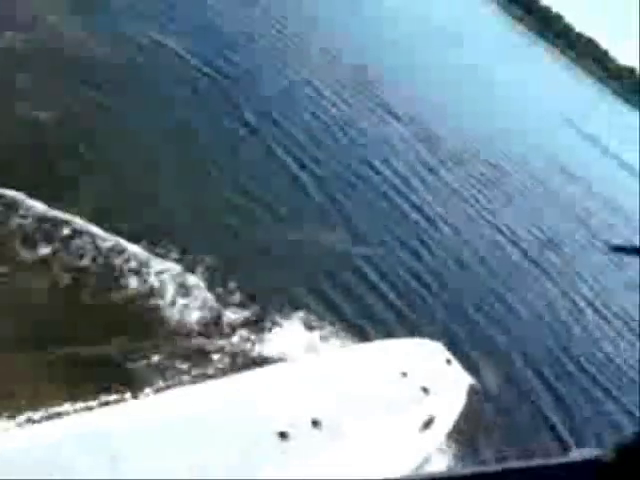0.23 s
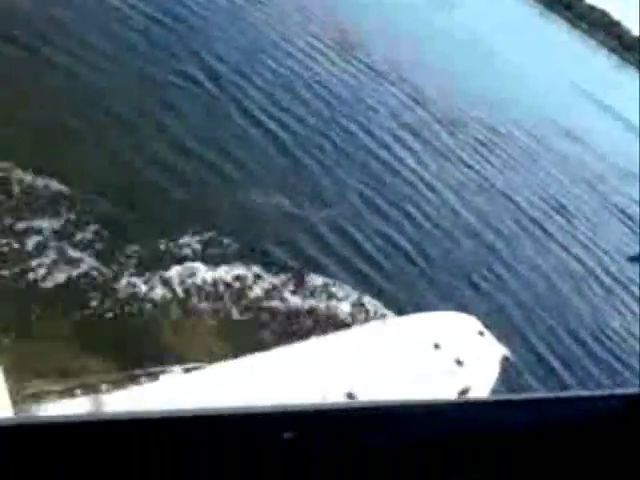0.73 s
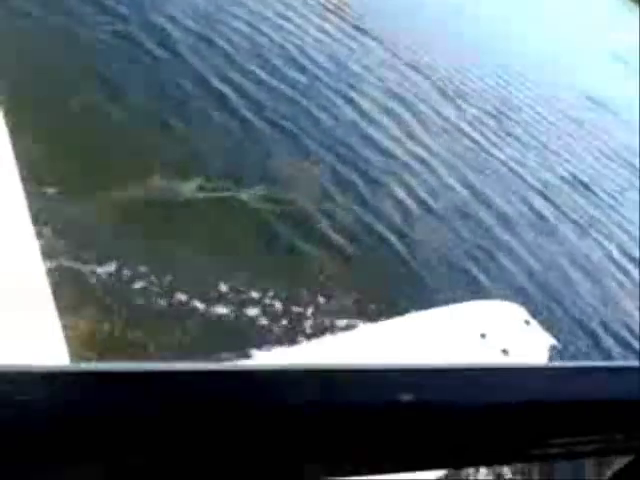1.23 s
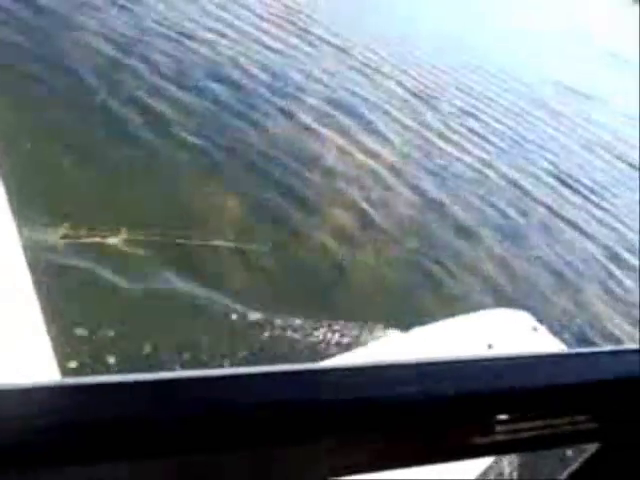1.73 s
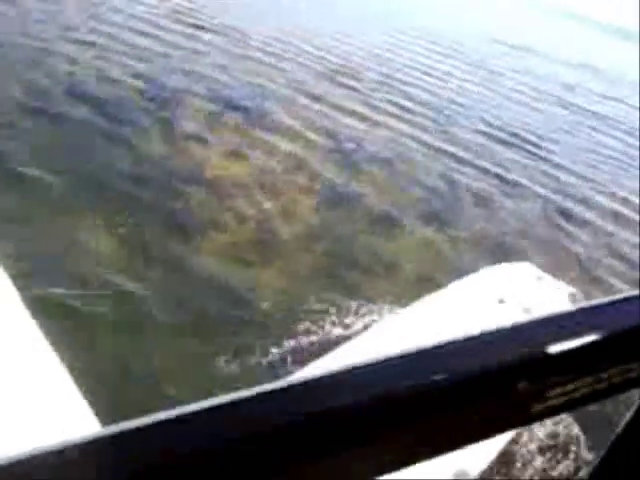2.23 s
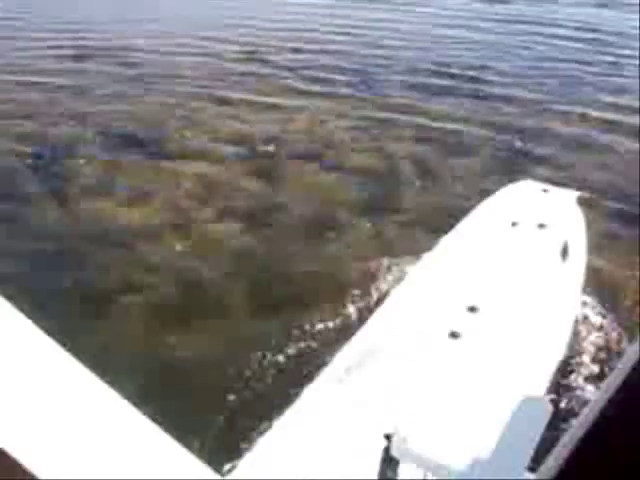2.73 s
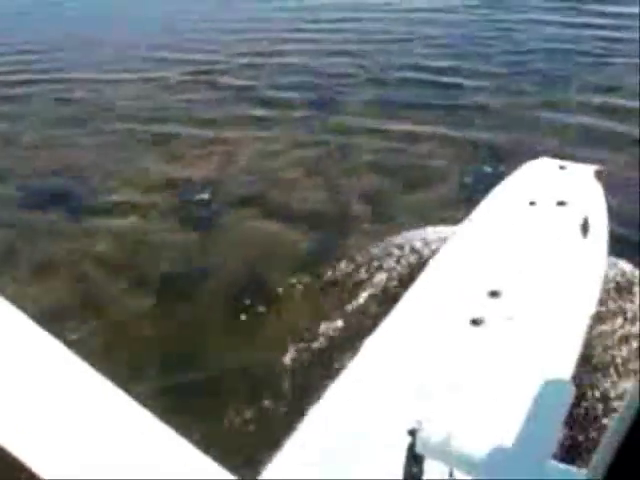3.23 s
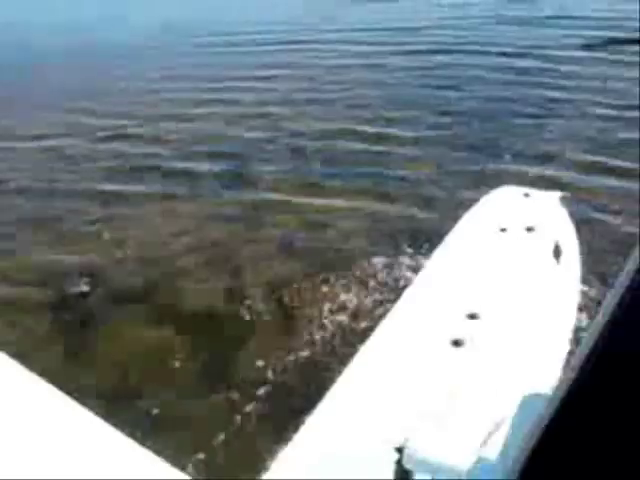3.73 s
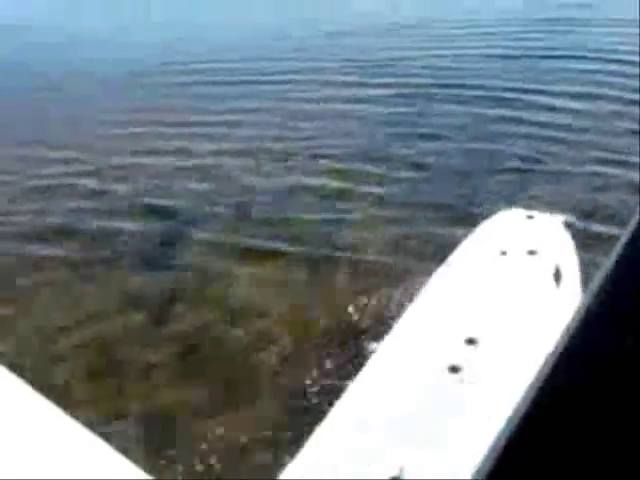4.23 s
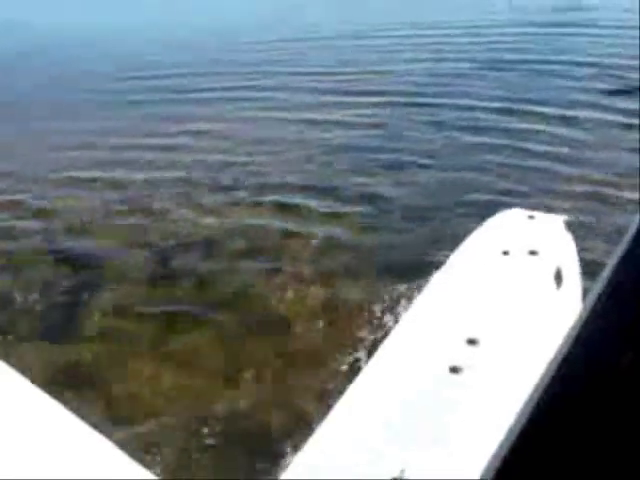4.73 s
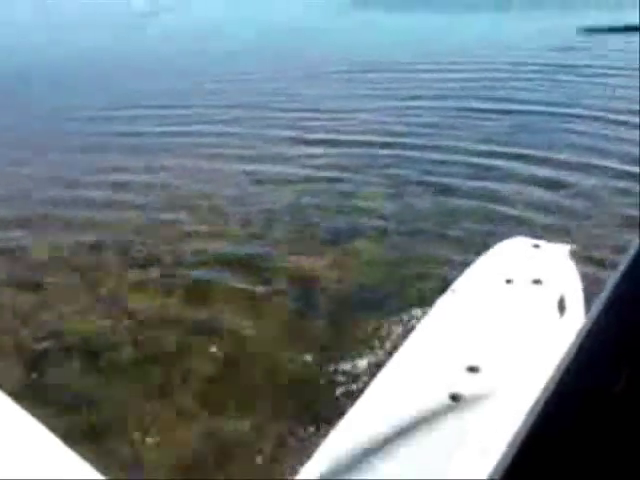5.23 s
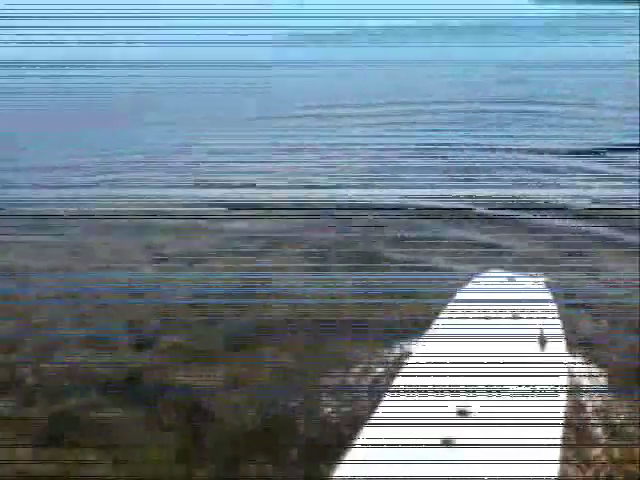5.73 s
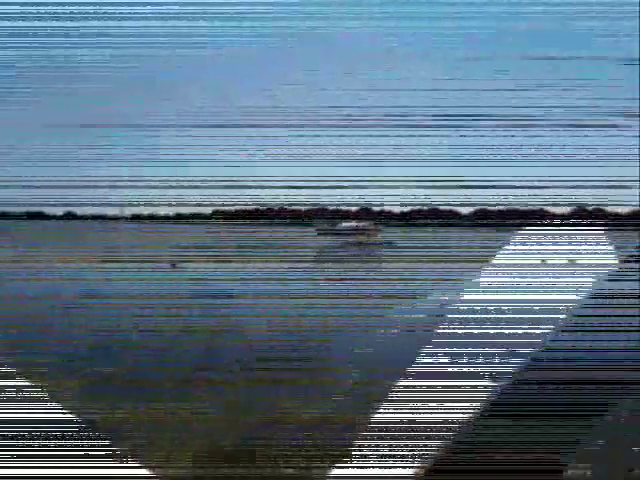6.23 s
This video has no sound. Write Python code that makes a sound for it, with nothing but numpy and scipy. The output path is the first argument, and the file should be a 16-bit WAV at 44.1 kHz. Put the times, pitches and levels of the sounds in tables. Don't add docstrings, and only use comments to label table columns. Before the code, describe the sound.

At the open door of a floatplane on a lake, rough wind thumps overload a small microphone above a low idling engine. The idle sinks, a thin panel hum shows briefly, then the engine revs up quickly to a hard propeller drone. Gusts return, break into isolated cracks and thin out. Water bubbles faintly beside the float, and a last flurry comes as everything fades.

```python
import sys
import numpy as np
from scipy import signal
from scipy.fft import rfft, irfft, next_fast_len
from scipy.io import wavfile
from scipy.ndimage import uniform_filter1d, map_coordinates

SR = 44100
rng = np.random.default_rng(int(sys.argv[2]) if len(sys.argv) > 2 else 0)


def elevation(decibels):
    levels = np.asarray(decibels, float)
    return 10 ** (levels / 20)


def transcribe(u):
    v = np.clip(np.atleast_2d(u).T, -1, 1)
    q = np.round(v * 32767).astype(np.int16)
    wavfile.write(sys.argv[1], SR, q)


N = 285710

# (time [s], firing rate [Hz], power [dB], once-a-turn bark depth [0-1])
ENGINE = [(0, 61.13, -30, 0.8), (1.2, 54.3, -39.5, 0), (1.6, 53.27, -38, 0.4), (2.2, 54.84, -35, 0.3),
          (2.33, 57.7, -31.5, 0.7), (2.44, 61.87, -28, 0.6), (2.55, 70.3, -22.5, 0.8),
          (2.8, 84.42, -22.5, 0.2), (3.1, 94.7, -26.5, 0.5), (3.6, 96.5, -29, .1), (4.2, 95.33, -25, 0.2),
          (5, 94.8, -24.5, .1), (5.7, 94.69, -22, 0.4), (6.1, 94.84, -21.5, .4), (6.22, 95.08, -19, .75),
          (6.35, 95.16, -18.5, .85), (6.48, 96, -21, 0.6)]
# (multiple of shaft speed [1], level [dB])
SHAFT_ORDERS = [(1, -16), (2, -1.5), (3, -19.5), (4, -10.5), (5, -13.5), (6, -19), (7, -17.5), (8, -17)]
# (frequency [Hz], density [dB per Hz])
RASP_SPECTRUM = [(180, -34.5), (300, -9), (327, 0), (376, -2), (401, -10.5), (427, -13.5), (451, -10.5),
                 (868, -3), (998, -8.5), (1100, -8), (1600, -14.5), (2980, -22), (3900, -35), (5070, -79.5),
                 (8580, -120)]
# (frequency [Hz], density [dB per Hz])
BARK_SPECTRUM = [(250, -28), (550, -4), (1050, -17), (1450, 0), (1750, -2), (2100, -9), (2600, -22),
                 (4000, -32)]
# (frequency [Hz], width [Hz], gain [dB])
COWL_RESONANCES = [(850, 250, 0), (1620, 230, 4), (2080, 240, 6)]
# (frequency [Hz], density [dB per Hz])
WASH_SPECTRUM = [(18, -58), (30, -17), (86, 8), (144, -3), (301, -3), (326, -8.5), (402, -11.5), (700, -13),
                 (910, -50.5), (1540, -120)]
# (time [s], length [s], strength
# [dB], sharpness [0-1])
GUSTS = [(0, 0.033, -3.5, 0.84), (0.043, 0.095, -4, 0.61), (0.156, 0.093, -5.5, 0.74),
         (0.258, 0.041, -8, .35), (0.287, 0.11, -6, 0.76), (0.418, 0.022, -3.5, .3),
         (0.476, 0.061, -4.5, 0.82), (0.58, .014, -4.5, 0.4), (0.601, 0.0058, -10.5, 0.1),
         (0.649, .05, -3, 0.69), (.747, 0.075, -6, 0.79), (0.825, 0.072, -4, 0.62),
         (0.916, .025, -9, 0.3), (0.952, 0.014, -7, 0.7), (1.008, 0.023, -4.5, 0.57),
         (1.033, .046, -3.5, 0.51), (1.105, 0.047, -3, 0.3), (1.177, 0.0066, -7, 1),
         (1.208, 0.047, -5, 0.83), (1.27, 0.038, -3, 0.62), (1.345, 0.018, -11, 0.6),
         (1.363, 0.037, -1, 0.66), (1.468, 0.014, -5.5, 0.7), (1.505, 0.036, -3.5, .6),
         (1.576, 0.024, -8.5, 0.3), (1.644, 0.0059, -4, .3), (1.733, 0.0029, -8.5, 0.2),
         (1.824, .018, -8, .4), (1.95, 0.014, -10.5, 0.3), (2.092, 0.023, -7.5, 0.01),
         (2.46, .0061, -8.5, 0.087), (2.519, 0.016, -10.5, 0.23), (2.622, 0.016, -12, 0.64),
            (2.678, 0.059, -9, 0.66), (2.744, 0.03, -3, 0.4), (2.781, .045, -6.5, .6),
            (2.825, 0.054, -8, 0.57), (2.919, 0.041, -5.5, .45), (2.978, 0.033, -8.5, .25),
            (3.03, 0.025, -4, 0.76), (3.082, 0.027, -0.4, 0.26), (3.111, .047, -6.5, 0.48),
            (3.199, 0.059, -3.9, 0.57), (3.293, 0.059, -8.5, 0.24), (3.425, .029, -2.5, 0.33),
            (3.487, .041, -18.5, 0.86), (3.54, .04, -8.5, 0.27), (3.594, .0098, -17.5, 0.061),
            (3.62, 0.0082, -5.5, 0.24), (3.649, .046, -9.5, 0.58), (3.703, .036, -4.5, 0.46),
            (3.758, .024, -11, .52), (3.821, 0.0046, -3, 0.54), (3.923, .015, -3, 0.28),
            (3.958, 0.011, -13.5, 0.22), (4.003, .026, -3.5, .6), (4.06, 0.015, -20, .15),
            (4.088, 0.013, -6, .02), (4.143, 0.0051, -14.5, .4), (4.194, 0.023, -12, .2),
         (4.35, 0.029, -10, 0.085), (4.454, 0.016, -10.5, 0.22), (4.75, 0.014, -17.5, .1),
            (5.06, 0.01, -17, 0.12), (5.882, 0.012, -3, 0.33), (5.922, 0.036, -7.5, .3),
            (5.976, 0.065, -9, .4), (6.021, 0.025, -12, 0.26), (6.066, 0.022, -17, 0.55),
            (6.115, .034, -12.5, 0.71), (6.17, 0.021, -12, 0.33)]
# (frequency [Hz], density [dB per Hz])
THUMP_SPECTRUM = [(30, -31), (70, -1.5), (130, 7), (220, 2), (380, -1.5), (700, -21.5), (1500, -39.5)]
# (frequency [Hz], density [dB per Hz])
SLAP_SPECTRUM = [(120, -25.5), (250, -4), (450, 1), (750, -4), (1200, -20), (2500, -46.5)]
# (frequency [Hz], density [dB per Hz])
TEAR_SPECTRUM = [(300, -12.5), (700, 6.5), (1200, 5.5), (2000, -2), (3200, -9), (4500, -16), (6000, -30)]
# (time [s], crack level [dB])
SNAPS = [(1.6439, -27.5), (1.7283, -33), (1.8269, -36), (2.1097, -30.5), (2.4575, -30.5), (3.0429, -12),
         (3.301, -15.5), (3.4417, -13.5), (3.6772, 0.5), (3.8225, -13.5), (4.0124, -5.5), (4.3756, -25.5),
         (5.8832, -21.5), (5.9203, -21), (5.9759, -22), (6.1342, -19), (6.1918, -23), (6.3224, -29),
         (3.2005, -11), (3.2445, -7.5), (4.0195, -7.5), (4.212, -25.5), (5.816, -19)]
# (time [s], level [dB])
WAKE = [
    (0, -39),
    (2.2, -39),
    (2.5, -30),
    (2.8, -31),
    (5.6, -33),
    (6.48, -38),
]
# (time [s], frequency [Hz], level [dB])
HUM = [(1.5, 436, -66.5), (1.7, 435, -31.5), (2, 438.3, -33), (2.3, 434.6, -31), (2.45, 446.4, -38),
       (2.6, 441, -63.5)]
# (frequency [Hz], gain [dB])
MIRROR_LEAK = [(3900, -12), (4000, -2), (4100, -4), (4300, -8), (4700, -19), (5000, -29), (5300, -45),
               (5600, -80)]
# (time [s], gain [1])
FADE = [(0, 1), (5.5, 1), (6.75, 0)]

BARK_S = 6.325
TONE_DB, TONE_BARK_DB = 6, -1
WASH_DB, WASH_BARK_DB = 8, -4
HIT_S, LET_GO_S = 0.001, 0.0096
LINGER_S, LINGER_DB, LINGER_TEAR_DB = 0.12, -10.5, -17
TEAR_DB, TEAR_SHARP_DB = -22.5, 20
TEAR_GROWS_DB_PER_DB = 0.46
PUSH_DB, PUSH_GROWS_DB_PER_DB = 3, 0.45
SAMPLING_HZ = 8000


def unit(x):
    return x / np.sqrt(np.mean(x ** 2) + 1e-20)


def curves(rows):
    s, *cols = np.transpose(rows)
    return [np.interp(np.arange(N) / SR, s, c) for c in cols]


def wobble(rate_hz):
    return map_coordinates(rng.standard_normal(4000), [np.arange(N) * rate_hz / SR])


def filtered(x, response):
    m = next_fast_len(N + SR // 2)
    spectrum = rfft(x, m) * response(np.fft.rfftfreq(m, 1 / SR))
    return irfft(spectrum, m)[..., :N]


def coloured(x, spectrum):
    f, db = np.transpose(spectrum)

    def response(hz):
        return elevation(np.interp(np.log(hz + 1), np.log(f + 1), db, left=-120, right=-120))

    return unit(filtered(x, response))


def patchy(patch_db):
    z = signal.stft(rng.standard_normal(N + 512), nperseg=512)[2]
    field = uniform_filter1d(rng.standard_normal(z.shape), size=4, axis=0)
    field = uniform_filter1d(field, size=8, axis=1)
    return signal.istft(z * elevation(patch_db * unit(field)), nperseg=512)[1][:N]


def evened(x, span_s, share):
    power = np.abs(uniform_filter1d(x ** 2, round(span_s * SR)))
    return unit(x / (power + 0.02) ** (share / 2))


def clip(x, top, hard):
    return x / (1 + np.abs(x / top) ** hard) ** (1 / hard)


def cowl_gain(hz):
    return 1 + sum((elevation(db) - 1) / (1 + ((hz - c) / w) ** 2) for c, w, db in COWL_RESONANCES)


def exhaust(turns, bark):
    once = unit(np.exp(-4 * (turns % 1)) * elevation(1.2 * wobble(45)))
    each = 1 + 0.15 * np.cos(4 * np.pi * turns)
    puff = coloured(patchy(3) * once, BARK_SPECTRUM)
    pulse = coloured(once, BARK_SPECTRUM)
    barks = unit(puff + 0.7 * pulse)
    steady = unit(filtered(coloured(patchy(1.6) * each, RASP_SPECTRUM), cowl_gain))
    share = np.clip(bark, 0, 1)
    return np.sqrt(1 - share ** 2) * steady + share * barks


def engine():
    firing_hz, power_db, bark = curves(ENGINE)
    turns = np.cumsum(firing_hz * (1 + 0.006 * wobble(9))) / (2 * SR)
    turns = turns - turns[round(BARK_S * SR)]
    tones = np.zeros(N)
    for order, db in SHAFT_ORDERS:
        tones += elevation(db + 0.89 * wobble(14)) * np.sin(2 * np.pi * (order * turns + rng.random()))
    rasp = exhaust(turns, bark)
    wash = coloured(patchy(0.79) * elevation(0.26 * wobble(21)), WASH_SPECTRUM)
    wash = evened(wash, span_s=0.23, share=0.79)
    tone_gain = np.sqrt(2) * elevation(power_db + TONE_DB + TONE_BARK_DB * bark)
    rasp_gain = elevation(power_db + 3.5 + 1.0 * wobble(14))
    wash_gain = elevation(power_db + WASH_DB + WASH_BARK_DB * bark)
    return tone_gain * tones + rasp_gain * rasp + wash_gain * wash


def gust_gains():
    t = np.arange(N) / SR
    thump, slap, tear = np.zeros((3, N))
    for s, length_s, db, sharp in GUSTS:
        near = slice(max(round((s - 0.05) * SR), 0), round((s + length_s + 0.15) * SR))
        rise = np.minimum(t[near] - s, 0) / HIT_S
        release = np.maximum(t[near] - s - length_s, 0) / LET_GO_S
        shape = np.exp(rise - release)
        small = np.clip(sharp, 0, 1)
        thump[near] += elevation(db + 1.5) * np.sqrt(1 - small) * shape
        slap[near] += elevation(db - 2.9) * np.sqrt(small) * shape
        tear_db = db + TEAR_GROWS_DB_PER_DB * (db + 6) + TEAR_DB + TEAR_SHARP_DB * sharp
        tear[near] += elevation(tear_db) * shape ** 1.4

    def linger(gain, db):
        return elevation(db) * uniform_filter1d(gain, round(LINGER_S * SR))

    return (thump + linger(thump + slap, LINGER_DB),
            slap + linger(slap, LINGER_TEAR_DB),
            tear + linger(tear, LINGER_TEAR_DB))


def gusts():
    thump, slap, tear = gust_gains()
    flutter = wobble(70)

    def eddies(spectrum):
        flow = evened(coloured(rng.standard_normal(N), spectrum), span_s=0.016, share=0.75)
        return unit(elevation(3.1 * flutter) * flow)

    lumps = elevation(2.5 * flutter + 3.4 * wobble(300)) * rng.standard_normal(N)
    high = evened(coloured(lumps, TEAR_SPECTRUM), span_s=0.044, share=0.35)
    return thump * eddies(THUMP_SPECTRUM) + slap * eddies(SLAP_SPECTRUM) + tear * high


def snaps():
    out = np.zeros(N + 1000)
    t = np.arange(800) / SR
    u = t / 0.0012
    for s, crack_db in SNAPS:
        push = np.sign(rng.standard_normal()) * u * (2 - u) * np.exp(1 - u)
        crack = np.exp(-t / 0.0028) * rng.standard_normal(len(t))
        push_gain = elevation(PUSH_DB + PUSH_GROWS_DB_PER_DB * crack_db)
        out[round(s * SR):][:len(t)] += push_gain * push + elevation(crack_db + 3.5) * crack
    return out[:N]


def wake(count):
    when, pitch, size = rng.random((3, count))
    hz = 900 * 2.5 ** pitch[:, None]
    t = np.arange(1300) / SR
    u = t * hz / 16
    tone = np.sin(2 * np.pi * hz * t * (1 + 0.04 * u))
    blips = tone * u * np.exp(-2 * u) * elevation(-5 * np.log(size + 0.06))[:, None]
    at = (when * N).astype(int)[:, None] + np.arange(len(t))
    water = np.bincount(at.ravel(), blips.ravel(), N + len(t))[:N]
    return elevation(curves(WAKE)[0]) * unit(water)


def panel():
    hz, db = curves(HUM)
    phase = 2 * np.pi * np.cumsum(hz + 4 * wobble(12)) / SR
    return np.sqrt(2) * elevation(db + 2.5 * wobble(16)) * np.sin(phase)


def scene():
    return (engine() + gusts() + snaps() + wake(count=520) + panel())[None]


def camera_band(hz):
    high_pass = 1j * hz / (55 + 1j * hz)
    low_pass = 1 / np.sqrt(1 + (hz / 3650) ** 14)
    edge = np.clip((SAMPLING_HZ / 2 + 100 - hz) / 200, 0, 1) ** 0.5
    return high_pass * low_pass * edge


def mirror_gain(hz):
    f, db = np.transpose(MIRROR_LEAK)
    return elevation(np.interp(hz, f, db, left=-120, right=-120))


def top_cut(x):
    return signal.sosfilt(signal.butter(12, 15400, fs=SR, output="sos"), x)


def record(dry):
    capsule = clip(dry, top=1.7, hard=2.5)
    kept = filtered(capsule, camera_band)
    mirrored = 2 * kept * np.cos(2 * np.pi * SAMPLING_HZ * np.arange(N) / SR)
    leak = filtered(mirrored, mirror_gain)
    clipped = clip(kept + leak, top=0.965, hard=22)
    return top_cut(clipped * curves(FADE)[0])


dry = scene()
out = record(dry)
transcribe(out)
```